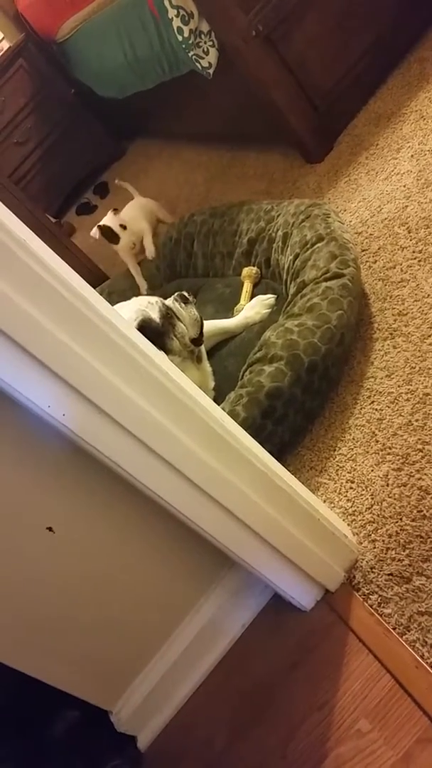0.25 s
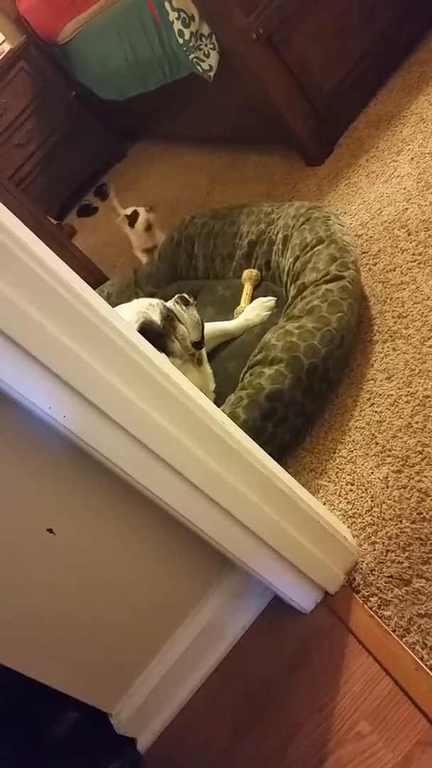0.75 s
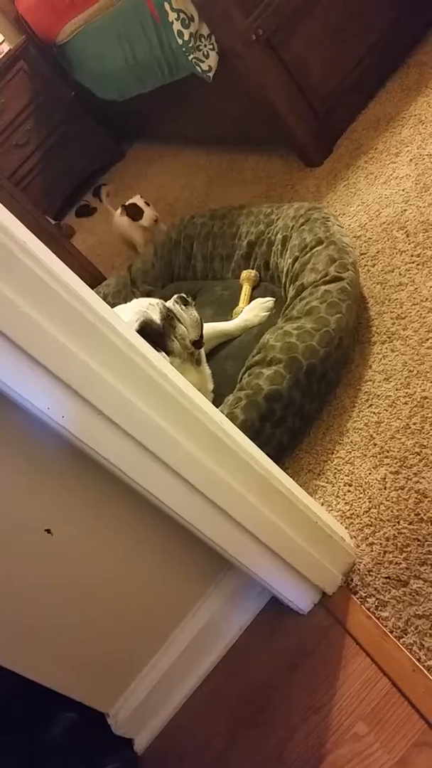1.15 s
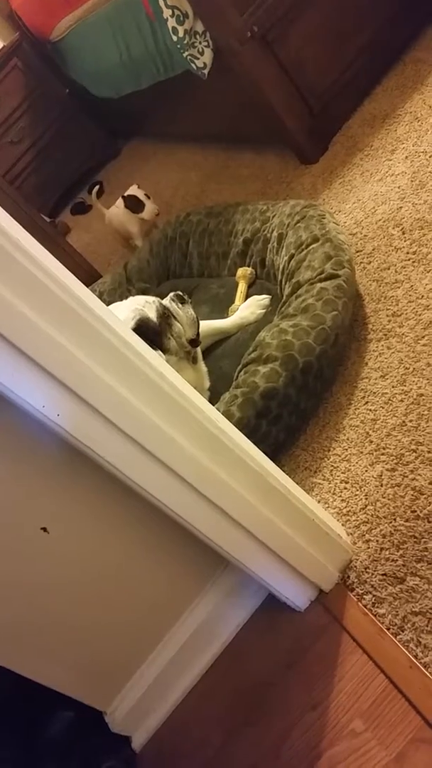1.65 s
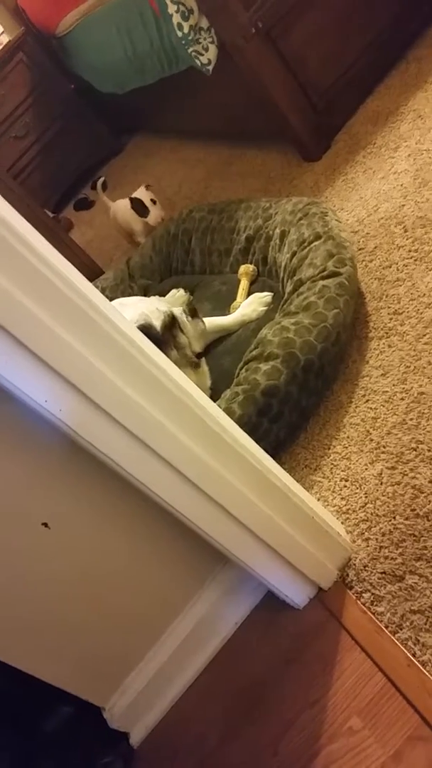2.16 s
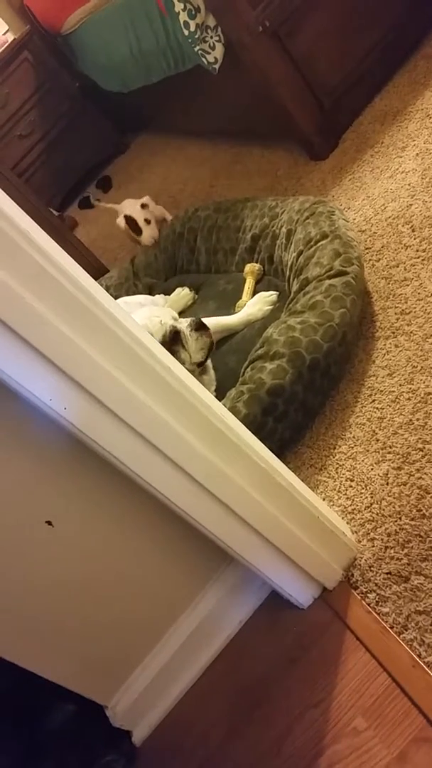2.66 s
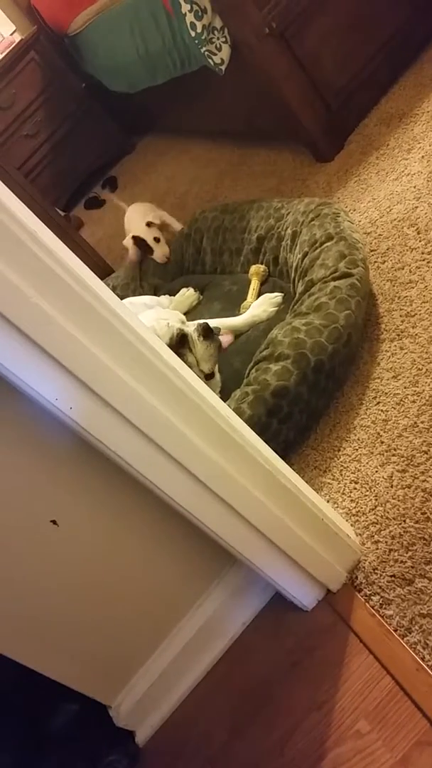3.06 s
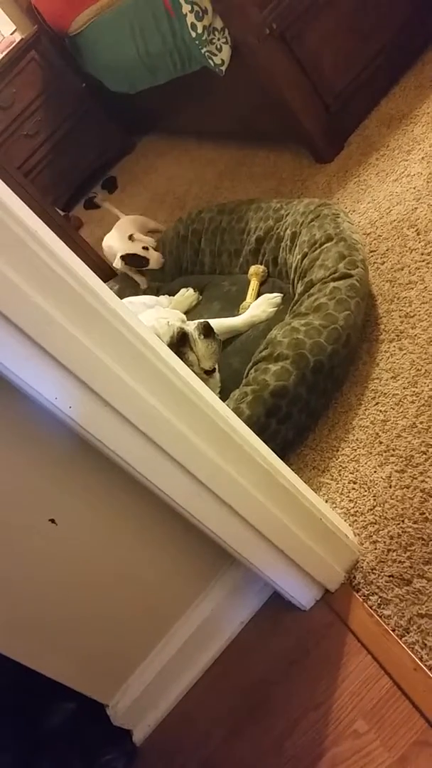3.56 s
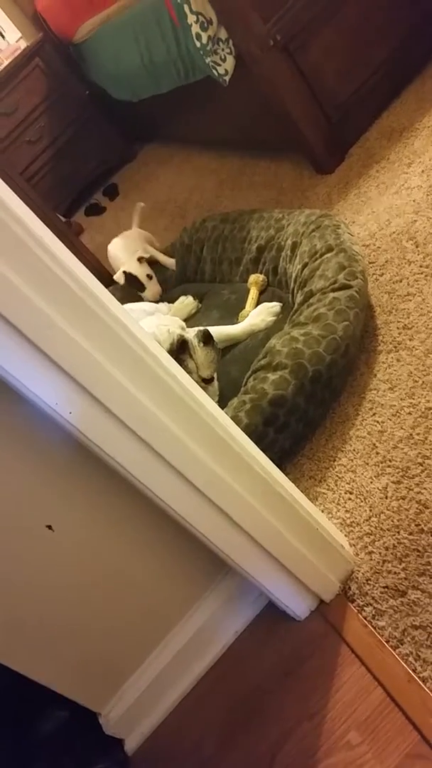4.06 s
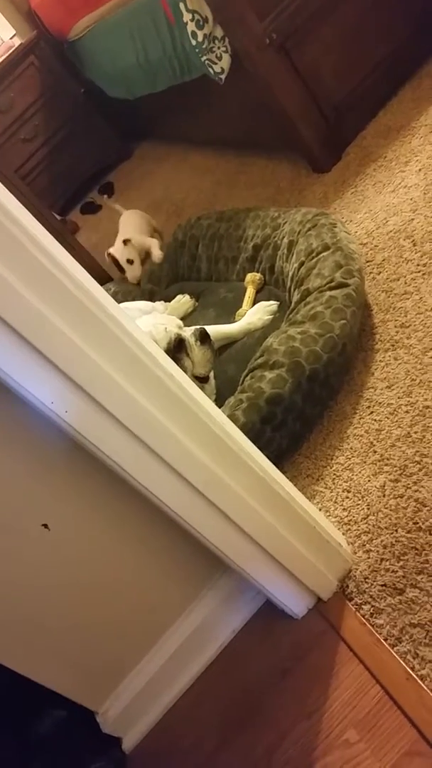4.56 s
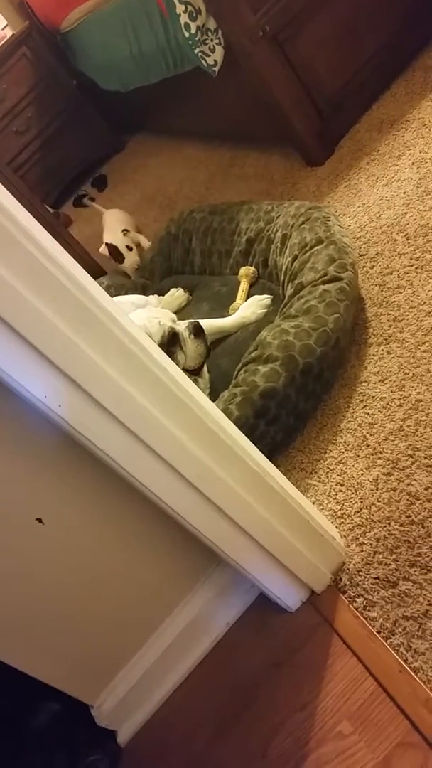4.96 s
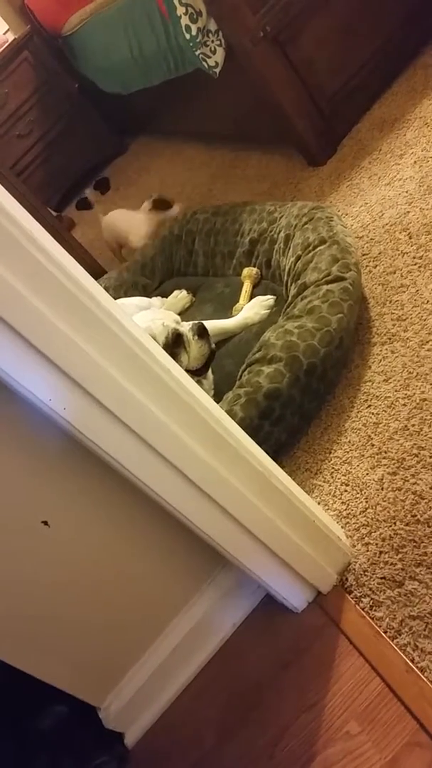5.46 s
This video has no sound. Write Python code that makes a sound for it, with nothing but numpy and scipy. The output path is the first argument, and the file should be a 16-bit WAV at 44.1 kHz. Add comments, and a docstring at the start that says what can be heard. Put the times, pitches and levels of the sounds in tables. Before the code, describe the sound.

A dog growls low and gutturally in a carpeted room, breaking into four sharp, high, cracking barks with mutters between, then the handheld camera gets bumped.

```python
"""Growling dog with four barks

A dog on its bed in a carpeted room growls low at a puppy: fold pulses and slow tissue flaps drive chest and mouth.
Four sharp, high barks, pulse trains through a moving mouth, leap up in pitch, crack and sink; growls mutter between.
Nasal air is shaped noise; bumps on the hand-held camera are dull pushes with a case rattle.
The room answers briefly over murmur, hum and hiss; the right microphone faces away and hears little treble."""
import sys
import numpy as np
from scipy import signal
from scipy.fft import rfft, irfft, next_fast_len
from scipy.io import wavfile
from scipy.ndimage import uniform_filter1d, map_coordinates

SR = 44100
rng = np.random.default_rng(int(sys.argv[2]) if len(sys.argv) > 2 else 0)


def store_pcm(level_fs):
    """Save levels as 16-bit WAV."""
    pcm = np.round(np.clip(level_fs, -1, 1) * 32767).astype(np.int16)
    wavfile.write(sys.argv[1], SR, np.atleast_2d(pcm).T)


N = 252428

# growls: (start [s], length [s], relative level [dB], relaxed starting pitch [Hz],
# rattle, share of slow separate flaps [0-1], parted lips, relative mouth against chest [dB])
GROWLS = [ (-.06, .73, -31, 96.6, 0.1, -11), (.71, .09, -35.5, 88.79, .18, -6.5),
          (.94, 0.14, -38, 172.7, .3, -19), (1.08, 0.26, -39, 167, 0.17, -8),
          (2.06, .3, -42, 94.5, .05, -29.5), (2.368, .08, -48, 83.37, .25, -17.5),
          (2.5, 0.23, -48, 98.22, .45, -22), (2.76, 0.054, -45.5, 102.5, .35, -21),
          (2.862, .05, -46, 91.3, .45, -5.5), (2.92, .14, -42.5, 166.2, .15, -13),
          (3.224, .065, -41.5, 158, .2, -17.5), (3.65, .06, -49, 112.6, .45, -23),
          (3.811, .075, -46.5, 161.8, .4, -24), (3.931, .045, -51.5, 95.13, 0.3, -19),
          (4.086, .095, -41.5, 102.7, .4, -27), (4.248, 0.13, -39.5, 97.1, .75, -27),
          (4.385, 0.19, -42.5, 97.05, .65, -18.5), (4.555, .27, -40.5, 97.43, .55, -17),
          (4.834, .11, -35, 163.1, .25, -12), (4.94, 0.14, -42, 93.84, .48, -9),
          (5.15, .08, -45, 112.9, .6, 3.5), (5.22, .27, -36.5, 171.6, .25, -10.5),
          (5.503, .13, -47, 103.7, .85, -2.5)]
# chest body: (frequency [Hz], relative gain [dB])
CHEST_SPECTRUM = [(30, -29), (60, -6), (95, 6), (130, -3.5), (160, 0.5), (190, -10.5), (222, -1),
                  (310, -15.5), (430, -17.5), (1000, -76.5)]
# mouth body in growls: (frequency [Hz], relative gain [dB])
MOUTH_SPECTRUM = [(200, -33.5), (420, -9.5), (590, 2), (800, -11), (1030, -17.5), (1290, -7), (1480, -15.5),
                  (1640, -13), (2900, -40), (6000, -64.5)]
# barks: (outburst [s], lead-in [s], attack [s], climb [s], hold [s], top pitch [Hz],
# time scale of the last octave's climb [s], relative level [dB], swell [dB/s], base roughness [0-1],
# crack length [s], pressed ring [dB])
BARKS = [ (.834, .002, .008, .018, .077, 1100, .05, -19.5, 105, .18, .052, 10),
         (2.921, 0.038, .013, .002, .013, 1010, .06, -28.5, 22, .24, .036, 5),
         (4.812, .01, 0.027, .025, .036, 696.6, .09, -28, 128, .22, .012, 11),
         (5.21, .035, .045, .008, .03, 558.5, .15, -33.5, -32, 0.8, .01, 10.5)]
# mouth in each bark: (first resonance at start [Hz], at end [Hz], its height [dB],
# second resonance [Hz], its height [dB], treble [dB])
JAWS = [(1398, 440, 17, 2400, 9, 2.5), (1190, 1007, 11, 2400, -0.5, -6), (1310, 2000, 16.5, 3000, 1, -11.5),
        (1640, 1450, 19.5, 1400, -0.5, -5.5)]
# throat in barks: (frequency [Hz], relative gain [dB])
THROAT_SPECTRUM = [(200, 2.5), (700, -19), (1700, -15), (3000, -12), (4150, -13.5), (5600, -30),
                   (10000, -36.5), (13500, -27), (16000, -29)]
# snorts through nose and teeth: (peak [s], relative level [dB], half-length to 1/e [s])
SNORTS = [(0.694, -65.5, 0.058), (1.057, -50, 0.12), (1.287, -61.5, 0.098), (2.788, -76.5, 0.044),
          (3.051, -64.5, 0.041), (3.27, -74, 0.079), (4.919, -63.5, 0.145), (5.334, -63, 0.16)]
# nasal passages: (frequency [Hz], relative gain [dB])
NOSE_SPECTRUM = [(1500, -5.5), (3000, -3.5), (4200, 2), (5100, 3.5), (5900, -14), (6600, -9.5), (7500, -14),
                 (8600, -4), (10500, -13), (13200, -7.5), (16000, -16.5)]
# bumps on the camera: (time [s], relative push [dB], brightness [Hz], initial case rattle [dB])
BUMPS = [(4.183, -28.5, 690, -60.5), (4.706, -38, 199.5, -73), (4.85, -20, 206, -53),
         (5.662, -24, 207, -47), (5.698, -19.5, 499, -37.5), (5.709, -12.5, 392, -27),
         (5.715, -17.5, 309.7, -15.5)]
# rattling case: (frequency [Hz], relative gain [dB])
CASE_SPECTRUM = [(200, -3.5), (900, -2.5), (1300, -4), (1750, -0.5), (2700, -28.5), (9000, -38.5),
                 (16000, -43.5)]
# room decay: (frequency [Hz], t60 [s])
ROOM_T60 = [(100, 0.9), (1200, .43), (14000, 0.33)]
# room balance: (frequency [Hz], relative room against direct [dB])
ROOM_GAIN = [(90, -13.5), (250, -4.5), (1100, -1.5), (14000, -1)]
# house murmur: (frequency [Hz], relative spectral density [dB])
HOUSE_SPECTRUM = [(25, 1.5), (115, -4), (400, -12), (650, -29), (1400, -25.5), (2400, -42), (6000, -72.5)]
# microphone hiss: (frequency [Hz], relative gain [dB])
HISS_SPECTRUM = [(2500, -21.5), (3400, -16.5), (4100, -1), (4700, 4.5), (5600, -23), (10000, -31),
                 (15500, -17)]
# microphone shadow: (frequency [Hz], left minus right [dB])
SHADE = [(100, 1.5), (220, 3), (700, 5), (1300, 5.5), (3000, 8.5), (4400, 21), (9500, 14.5), (12000, 3.5)]

# growl envelope and pitch sag as the air runs out
GROWL_ATTACK_S, GROWL_ATTACK_DB = 0.034, 15
GROWL_TIRE_DB_PER_S, GROWL_RELEASE_DB_PER_S = 4.5, 270
GROWL_SAG_OCTAVES_PER_S, GROWL_REST_DB = 0.14, -70
# a bark leaves the folds tight: growl pitch is raised, then settles
SETTLE_OCTAVES, SETTLE_AFTER_S, SETTLE_S = .62, .045, .035
# bark: soft lead-in, then after the hold falling pitch, a drop in level and a fade
LEAD_DB, BARK_LAG_S, BARK_DROP_S, BARK_DROP_DB = -19.5, 0.0061, 0.023, 9.5
BARK_FADE_DB_PER_S, BARK_TAIL_S, BARK_FALL_OCTAVES_PER_S = 213, 0.15, 16
# roughness added by the crack, and by fraying as the voice falls
CRACK_AFTER_S, CRACK_ROUGH, FRAY_PER_S = 0.0017, .55, 14
CLOSING_DB_PER_OCTAVE = 7  # treble lost as the mouth closes
HUM_HZ, HUM_DB = 116, -67
TOP_HZ = 15820


def amp(db):
    """Linear amplitude of a level in dB."""
    return 10 ** (np.asarray(db) / 20)


def unit(x):
    """x at rms 1."""
    return x / np.sqrt(np.mean(x ** 2) + 1e-20)


def even(x, span_s):
    """x with its running rms over span_s held near 1."""
    power = np.abs(uniform_filter1d(x * x, max(int(span_s * SR), 2)))
    return x / np.sqrt(power + 1e-4 * np.mean(x * x))


def along(points, hz):
    """(frequency [Hz], value) points interpolated on a log axis."""
    f, v = np.transpose(points)
    return np.interp(np.log(hz + 1), np.log(f + 1), v)


def hump(hz, centre_hz, octaves):
    """A bell of height 1 on a log-frequency axis."""
    return np.exp(-(np.log2((hz + 1) / np.maximum(centre_hz, 50)) / octaves) ** 2)


def wobble(rate_hz, n):
    """A smooth random curve of n samples, rate_hz knots a second."""
    return map_coordinates(rng.standard_normal(8192), [np.arange(n) * rate_hz / SR], mode="wrap")


def filtered(x, response):
    """x times a response of frequency."""
    n = x.shape[-1]
    m = next_fast_len(n + 8192)
    return irfft(rfft(x, m) * response(np.fft.rfftfreq(m, 1 / SR)), m)[..., :n]


def ring(x, spectrum, size=8192):
    """x through a causal, minimum-phase body of the given spectrum."""
    log_gain = np.log(amp(along(spectrum, np.fft.rfftfreq(size, 1 / SR))))
    cepstrum = irfft(log_gain)
    cepstrum[1:size // 2] *= 2
    cepstrum[size // 2 + 1:] = 0
    impulse = irfft(np.exp(rfft(cepstrum)))
    return signal.fftconvolve(x, impulse)[:len(x)]


def pulses(cycles):
    """One pulse, shared between two samples, at each whole cycle."""
    i = np.flatnonzero(np.diff(np.floor(cycles)) > 0)
    late = (np.floor(cycles[i + 1]) - cycles[i]) / (cycles[i + 1] - cycles[i])
    return np.bincount(np.r_[i, i + 1], np.r_[1 - late, late], len(cycles))


def blend(a, b, share):
    """Equal-power mix with the given share of b."""
    share = np.clip(share, 0, 1)
    return np.sqrt(1 - share) * a + np.sqrt(share) * b


def growl(effort_db, pitch_hz, rattle, lips_db, flap_hz=21, throb_db=3, mouth_throb_db=-3.0):
    """Vocal folds pulse while loose tissue flaps slowly, thumping the chest and chopping the mouth's rasp."""
    chest_air, mouth_air, scatter_db, jitter = .07, .36, 1.8, .034
    # a slack, rattling throat holds its pitch less well
    folds = np.cumsum(pitch_hz * (1 + jitter * (1 + 3 * rattle) * wobble(60, N))) / SR
    flaps = np.cumsum(flap_hz * (1 + 0.2 * wobble(14, N))) / SR
    swing = np.cos(2 * np.pi * flaps)
    throb = amp(throb_db * swing + scatter_db * wobble(80, N))
    voiced = unit(pulses(folds) * throb)
    slaps = unit(pulses(flaps) * amp(1.95 * wobble(25, N)))
    # a puff of air at each opening of the folds
    puffs = unit(rng.standard_normal(N) * np.exp(-4 * (folds % 1)) * throb)
    chest_drive = blend(blend(voiced, slaps, rattle), puffs, chest_air)
    chest = even(ring(chest_drive, CHEST_SPECTRUM), span_s=.1)
    mouth_drive = blend(voiced, puffs, mouth_air) * amp(mouth_throb_db * swing)
    mouth = even(ring(mouth_drive, MOUTH_SPECTRUM), span_s=0.23)
    return amp(effort_db - 1.0) * (chest + amp(lips_db - 3.5) * mouth)


def throat():
    """Effort (dB), pitch (Hz), rattle and lips (dB) through time, weighted by the power of each growl."""
    start, length, db, hz, rattle, lips_db = np.transpose(GROWLS)[:, :, None]
    t = np.arange(N) / SR - start
    held = np.clip(t, 0, length)
    rising_db = GROWL_ATTACK_DB * np.minimum(t / GROWL_ATTACK_S - 1, 0)
    dying_db = GROWL_TIRE_DB_PER_S * held + GROWL_RELEASE_DB_PER_S * np.maximum(t - length, 0)
    power = amp(db + rising_db - dying_db) ** 2 + 1e-20
    total = power.sum(0)
    share = power / total
    effort_db = 10 * np.log10(total + amp(GROWL_REST_DB) ** 2)
    sagging_hz = hz * 2 ** (-GROWL_SAG_OCTAVES_PER_S * held)
    pitch_hz = (share * sagging_hz).sum(0) * 2 ** tightness()
    return effort_db, pitch_hz, (share * rattle).sum(0), (share * lips_db).sum(0)


def tightness():
    """Octaves by which folds left tight by the barks raise the growl."""
    t = np.arange(N) / SR
    total = 0
    for s, _, _, _, hold, *_ in BARKS:
        settling_s = np.maximum(t - s - hold - SETTLE_AFTER_S, 0)
        total = total + (t > s) * np.exp(-settling_s / SETTLE_S)
    return SETTLE_OCTAVES * total


def bark(row, jaw, flutter_db=5, doubling=.4, throb_hz=53, throb_db=2, dulling=0.44):
    """Tight folds give a clean squeal; with roughness their cycles scatter, alternate and fill with air."""
    jitter, breath = .06, .95
    burst, lead, attack, _, hold, *_, pressed_db = row
    start = int((burst - lead - attack) * SR)
    t = np.arange(start, min(int((burst + hold + BARK_TAIL_S) * SR), N)) / SR - burst
    n = len(t)
    pitch_hz, level_db, rough = yelp(t, *row[1:-1])
    rough = np.clip(rough, 0, 1)
    first_hz, last_hz, first_db, second_hz, second_db, treble_db = jaw

    def mouth(x):
        """The first resonance slides with the jaw; little sounds below the pitch."""
        hz, s, z = signal.stft(x, SR, nperseg=512, noverlap=448)
        hz = hz[:, None]
        since_burst = s + t[0]
        sliding_hz = np.interp(s, [0, n / SR], [first_hz, last_hz])
        shape_db = along(THROAT_SPECTRUM, hz) + first_db * hump(hz, sliding_hz, octaves=0.43)
        shape_db = shape_db + second_db * hump(hz, second_hz, octaves=1 / 8)
        shape_db = shape_db + treble_db * hump(hz, 20000, octaves=.5)
        # at the top of the leap the pressed throat's upper resonance rings out
        pressed = np.exp(-((since_burst - .3 * hold) / (0.0098 + 0.2 * hold)) ** 2)
        shape_db = shape_db + pressed_db * pressed * hump(hz, 4000, octaves=1 / 5)
        # a softer voice is duller
        ease_db = np.interp(s, t - t[0], level_db - level_db.max())
        shape_db = shape_db + dulling * ease_db * np.log2(1 + hz / 2000)
        fallen = np.clip(BARK_FALL_OCTAVES_PER_S * (since_burst - hold + .012), 0, 1)
        treble_octaves = np.clip(np.log2((hz + 1) / 2400), 0, 1)
        shape_db = shape_db - CLOSING_DB_PER_OCTAVE * fallen * treble_octaves
        below = 1 + (.75 * np.interp(s, t - t[0], pitch_hz) / (hz + 1)) ** 8
        shaped = signal.istft(z * amp(shape_db) / below, SR, nperseg=512, noverlap=448)[1]
        return even(shaped[:n], span_s=.012)

    drift = jitter * rough * wobble(600, n) + .006 * wobble(120, n)
    cycles = np.cumsum(pitch_hz * (1 + drift)) / SR
    alternation = 1 + doubling * rough * np.cos(np.pi * cycles)
    sizes = amp(flutter_db * rough * wobble(350, n)) * alternation
    tone = mouth((pulses(cycles) - pitch_hz / SR) * sizes)
    air = mouth(rng.standard_normal(n) * np.exp(-2.5 * (cycles % 1)) * sizes)
    throb = throb_db * np.cos(2 * np.pi * throb_hz * t)
    voice = amp(level_db + throb) * blend(tone, air, breath * rough ** 1.5)
    return np.pad(voice, (start, N - start - n))


def yelp(t, lead, attack, climb, hold, top_hz, octave_s, db, swell, rough, crack_s):
    """Pitch (Hz), level (dB) and roughness of one bark, t seconds after its outburst."""
    falling = np.maximum(t - hold, 0)
    climb_octaves = (np.maximum(climb - t, 0) / octave_s) ** 1.5
    pitch_hz = top_hz * 2 ** (-climb_octaves - BARK_FALL_OCTAVES_PER_S * falling)
    fade_in_db = 10 * np.log10(np.clip((t + attack + lead) / lead, 1e-3, 1))
    opening_db = LEAD_DB * np.clip(-t / attack, 0, 1) + fade_in_db
    spent = np.maximum(falling - BARK_LAG_S, 0)
    closing_db = BARK_DROP_DB * np.minimum(spent / BARK_DROP_S, 1) + BARK_FADE_DB_PER_S * spent
    level_db = db + swell * np.clip(t, 0, hold) + opening_db - closing_db
    crack = CRACK_ROUGH * np.sin(np.pi * np.clip((t - CRACK_AFTER_S) / crack_s, 0, 1))
    return pitch_hz, level_db, rough + crack + FRAY_PER_S * spent


def snort(rasp_db):
    """Air forced out, in snorts and with the snarl, whistles faintly in the narrow nasal passages."""
    t = np.arange(N) / SR
    flow = sum(amp(db) * np.exp(-((t - s) / length) ** 2) for s, db, length in SNORTS)
    snarl = amp(rasp_db - 25.5)
    hiss = unit(ring(rng.standard_normal(N), NOSE_SPECTRUM))
    return (flow + snarl) * amp(2 * wobble(40, N)) * hiss


def bumps(t60_s=.035):
    """Each bump is one dull push and a brief rattle of the case."""
    out, t = np.zeros(N + SR), np.arange(SR // 10) / SR
    for s, db, hz, rattle_db in BUMPS:
        u = np.pi * hz * t
        push = 2 * amp(db) * u * u * (1 - u / 3) * np.exp(-u)
        noise = unit(ring(rng.standard_normal(len(t)), CASE_SPECTRUM))
        rattle = noise * amp(rattle_db - 60 * t / t60_s)
        out[int(s * SR):][:len(t)] += push + rattle
    return out[:N]


def room(x):
    """Direct sound, first at the left microphone, and a short decaying-noise tail that differs per side."""
    hz, t, z = signal.stft(rng.standard_normal((2, SR // 2)), SR, nperseg=256)
    t60_s = np.maximum(along(ROOM_T60, hz), .05)[:, None]
    energy_norm = np.sqrt(2 * np.log(1000) / (t60_s * SR))
    tail = signal.istft(z * amp(-60 * t / t60_s) * energy_norm, SR, nperseg=256)[1]
    delayed_tail = np.pad(tail, ((0, 0), (SR // 300, 0)))
    echo = signal.fftconvolve(x[None], delayed_tail, axes=1)[:, :N]
    # 0.23 ms between the sides
    direct = filtered(x, lambda hz: np.exp(np.outer([1, -1], 1j * np.pi * hz * 0.00023)))
    return direct + filtered(echo, lambda hz: amp(along(ROOM_GAIN, hz)))


def background(effort_db, swell=.3):
    """House murmur and hum, and a narrow hiss that rises by swell dB per dB of growl effort."""
    shared = rng.standard_normal(N)
    noise = blend(shared, rng.standard_normal((2, N)), 0.37)
    house = filtered(noise, lambda hz: amp(along(HOUSE_SPECTRUM, hz)))
    hiss = filtered(rng.standard_normal((2, N)), lambda hz: amp(along(HISS_SPECTRUM, hz)))
    hum = unit(np.sin(2 * np.pi * HUM_HZ * np.arange(N) / SR + .8 * wobble(8, N)))
    return amp(-62) * unit(house) + amp(HUM_DB) * hum + amp(-58.0 + swell * effort_db) * unit(hiss)


def scene():
    """Growls, barks and snorts sound in the room; the bumps reach the microphones through the case."""
    effort_db, pitch_hz, rattle, lips_db = throat()
    barks = sum(bark(row, jaw) for row, jaw in zip(BARKS, JAWS))
    voice = growl(effort_db, pitch_hz, rattle, lips_db) + amp(-1.5) * barks + snort(effort_db + lips_db)
    return room(voice) + bumps() + background(effort_db)


def record(dry):
    """The right microphone lies in shadow, at constant summed power; nothing passes above TOP_HZ."""
    def sides(hz):
        right = amp(-along(SHADE, hz))
        return np.array([np.ones_like(right), right]) * np.sqrt(2 / (1 + right ** 2))
    return filtered(dry, lambda hz: sides(hz) * (hz < TOP_HZ))


dry = scene()
out = record(dry)
store_pcm(out)
```